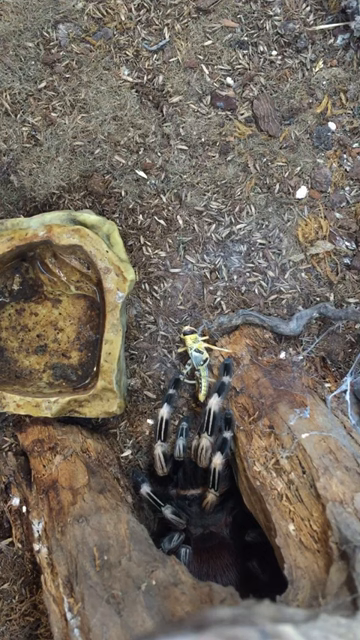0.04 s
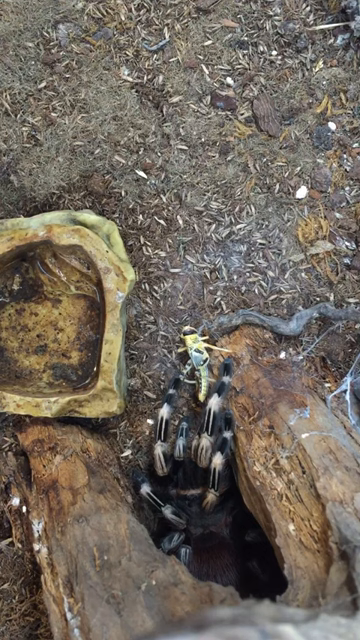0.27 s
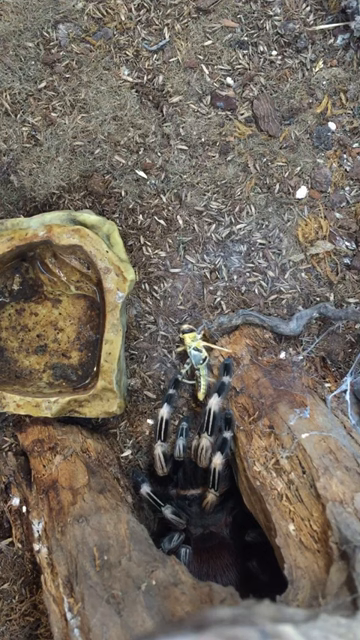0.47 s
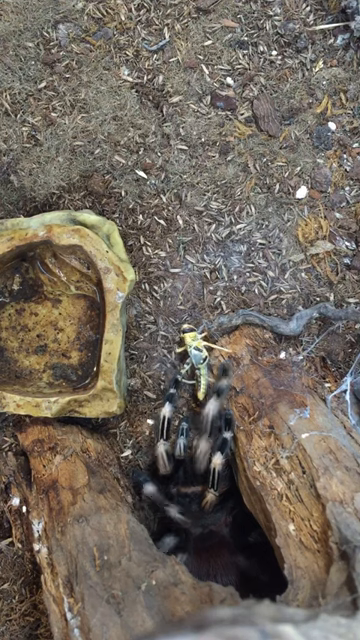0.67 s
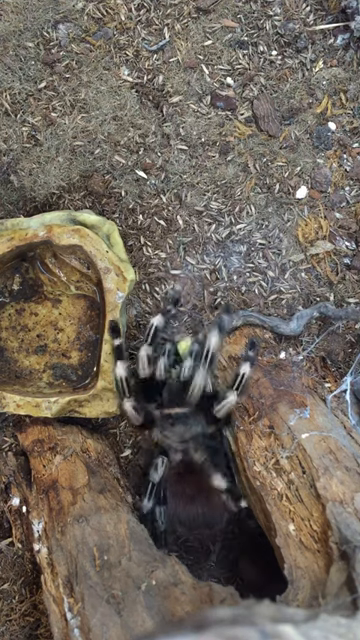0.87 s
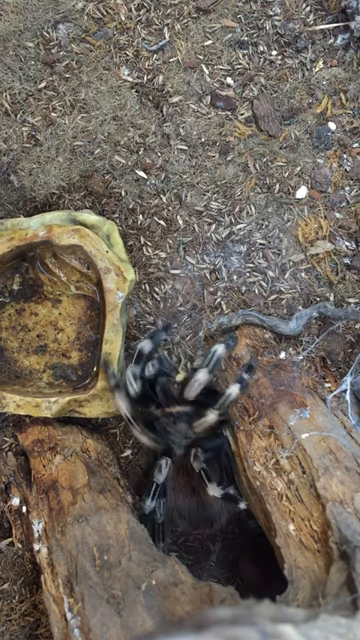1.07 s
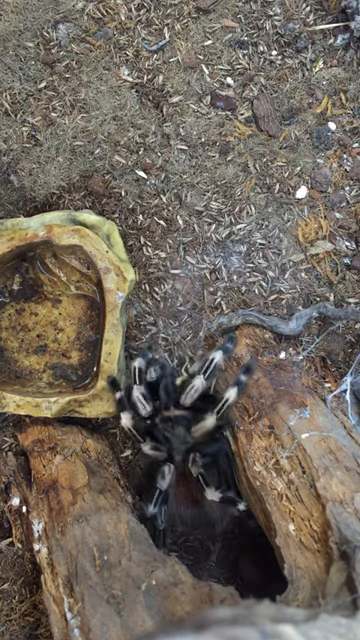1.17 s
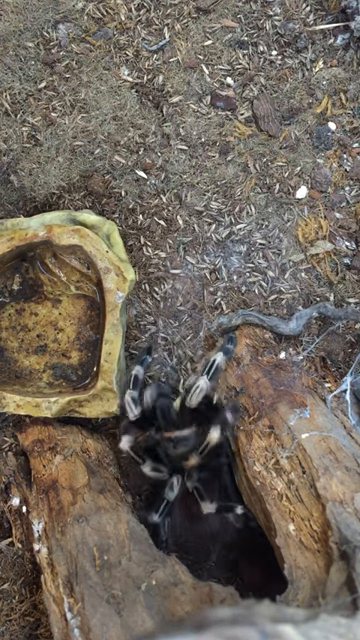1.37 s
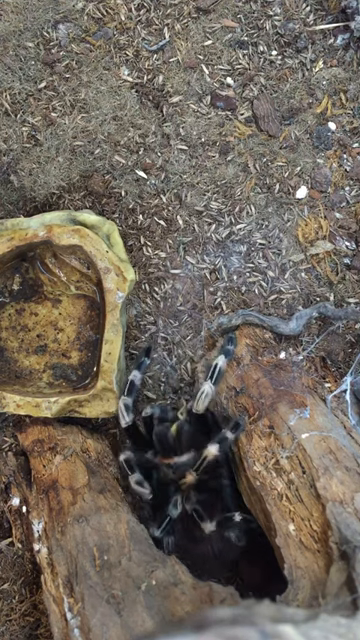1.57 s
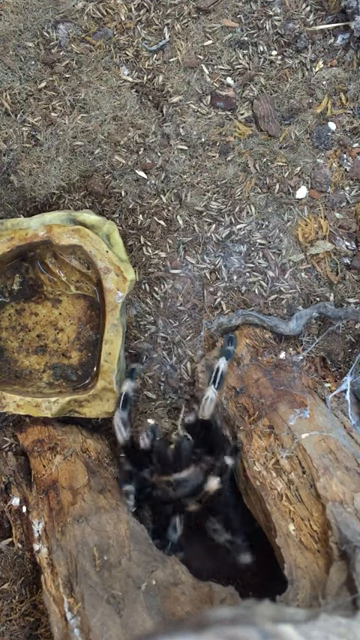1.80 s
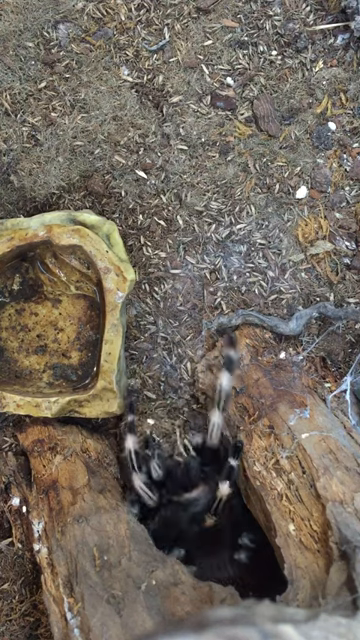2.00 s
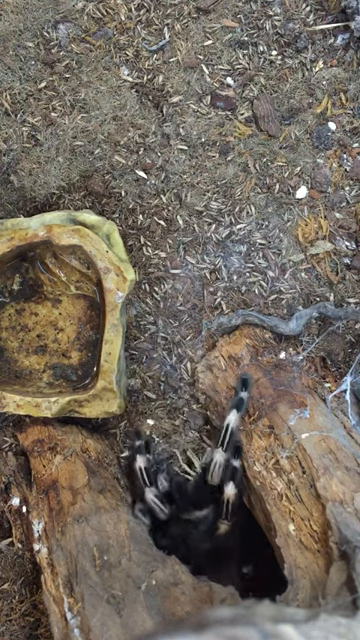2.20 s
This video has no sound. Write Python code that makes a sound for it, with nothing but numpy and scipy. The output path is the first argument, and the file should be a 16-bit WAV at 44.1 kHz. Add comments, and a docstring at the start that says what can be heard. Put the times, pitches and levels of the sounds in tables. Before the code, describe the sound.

A deep, dull thud sounds nearby and dies away in a room with faint electrical hum. Dry litter rustles softly as a spider pounces in a glass tank, and small, close cracks follow as it bites its prey.

```python
"""A quiet room with mains hum; a tarantula on dry litter in a glass tank.
A heavy, muffled thud, like a door shutting nearby, sets the room's low modes booming.
The spider lunges at an insect: litter snaps under its legs and it lands with soft knocks.
The prey's shell cracks in its fangs and rings briefly. Faint tones sound far off."""
import sys
import numpy as np
from scipy import signal
from scipy.fft import rfft, irfft
from scipy.io import wavfile

SR = 44100
rng = np.random.default_rng(int(sys.argv[2]) if len(sys.argv) > 2 else 0)


def unload_wav(signal):
    """Save mono or channel-first audio to the path in sys.argv[1] as 16-bit WAV at rate SR, clipped to [-1, 1]."""
    wavfile.write(
        sys.argv[1],
        SR,
        np.round(np.clip(np.atleast_2d(signal).T, -1, 1) * 32767).astype(np.int16),
    )


N = 99225
TIME_S = np.arange(N) / SR

# mains lines (frequency [Hz], level [dB])
HUM_LINES = [(49.5, -73.5), (100.2, -64), (150, -77.5), (200.3, -77), (301, -90.5)]
# room air and hiss (frequency [Hz], relative density [dB])
AIR_SPECTRUM = [(20, -120), (45, -82), (80, -87.5), (180, -92), (260, -102), (420, -110), (700, -111),
                (1400, -115), (2700, -117), (5000, -121), (9500, -123.5), (10600, -127), (14500, -126),
                (16000, -136)]
# blows of the thud (time [s], boom [dB], clatter [dB], rattle [dB])
THUD_BLOWS = [(0.039, -45.5, -79, -86), (.136, -18.5, -61.5, -70.5), (.246, -0.5, -51.5, -66),
              (0.317, -23.5, -70, -84)]
# beating room mode pairs (frequency [Hz], relative level [dB], t60 [s], split [Hz])
ROOM_MODE_PAIRS = [(46.5, -13, 0.72, 4.4), (64.3, -31.5, 0.52, 9), (81.25, -29.5, 0.83, 6.2),
                   (95.2, -44.5, 0.81, 11), (128.4, -48.5, .5, 3.7), (173.3, -24.5, 0.88, 2.4),
                   (191.1, -35.5, 1, 3.2)]
# low, mid and high noise of a blow (frequency [Hz], relative density [dB])
RUMBLE_SPECTRUM = [(25, -31.5), (40, 1.5), (75, 15.5), (120, 2.5), (200, -1.5), (260, -13), (350, -23.5),
                   (500, -69.5)]
CLATTER_SPECTRUM = [(250, 3.5), (450, -3), (570, 0), (675, 7), (850, -4), (980, -13), (1230, -9),
                    (1500, -25), (2200, -54)]
RATTLE_SPECTRUM = [(1400, -8), (2000, -6), (2850, 0), (3600, -6), (5000, -13), (6500, -15), (9000, -28.5),
                   (15000, -43)]
# knocks and ticks (time [s], frequency [Hz], width [Hz], level [dB], hold [s], t60 [s])
KNOCK_EVENTS = [(0.12, 742, 130, -69, 0.039, .1), (0.136, 2850, 180, -69.5, 0.022, 0.22),
                (0.131, 3280, 150, -72.5, 0.0065, .12), (0.209, 350, 38, -48, 0.035, 0.048),
                (0.213, 172, 30, -44, 0.024, .08), (0.236, 79.7, 20.2, -30, 0.034, 0.075),
                (0.549, 201.4, 6, -56, 0.044, 0.051), (.85, 4330, 420, -73, 0.017, 0.078),
                (0.888, 272, 70, -52, 0.0053, 0.074), (0.895, 458, 260, -61, 0.011, 0.092),
                (0.892, 734, 130, -73, .015, .15), (0.902, 194.4, 56, -61, 0.0273, 0.066),
                (.889, 1970, 296, -64.5, 0.0049, 0.053), (0.904, 84.8, 54, -53.5, 0.047, 0.32),
                (0.978, 1210, 44, -77, 0.0076, 0.066), (1.829, 167, 36, -59, 0.021, 0.08)]
# far tones (time [s], nominal length [s], level [dB], frequency [Hz])
TONE_EVENTS = [(0.757, 0.12, -69.5, 705), (1.112, 0.14, -81.5, 385), (1.272, 0.041, -69.5, 560),
               (1.337, 0.02, -64, 561), (1.349, 0.043, -81, 1290), (1.466, 0.073, -72, 705),
               (1.476, 0.061, -81, 546), (1.535, 0.21, -83, 759), (1.605, 0.062, -82.5, 1530),
               (1.896, 0.054, -78.5, 600)]
# leg pushes on the litter (time [s], level [dB], hold [s], t60 [s])
LEG_PUSHES = [(0.826, -77.5, 0.023, 0.11), (0.846, -70, 0.015, 0.21), (0.886, -72.5, 0.0069, 0.55),
              (0.961, -85, 0.065, 0.86), (1.177, -84, 0.13, 0.38)]
# litter snaps (frequency [Hz], relative density [dB])
LITTER_SPECTRUM = [(1000, -22), (2500, -1.5), (4300, -0.5), (7500, -4.5), (9400, 2.5), (10500, -4),
                   (12000, 2), (15500, -2)]
# cracks of shell and husks (time [s], body drive [dB], middle drive [dB], top drive [dB])
CRACK_EVENTS = [(0.8914, -57.5, -57, -72), (1.0851, -83, -69, -59), (1.8252, -50.5, -67, -67),
                (1.827, -54.5, -65, -61), (1.987, -40.5, -37, -30.5), (2.010, -58, -53, -57),
                (2.0156, -64, -52, -68), (2.0175, -66, -75, -55), (2.1125, -84, -71, -60),
                (2.119, -82, -67, -48.5), (2.1233, -84, -78, -56), (2.149, -80, -50, -36),
                (2.155, -84, -66, -63), (2.163, -87, -67, -48), (2.186, -82, -61, -55)]
# shell modes, four each for body, middle, top (frequency [Hz], relative level [dB], t60 [s])
CRACK_MODES = [(723, -9.5, 0.007), (990, -3.5, 0.0061), (2300, -4, 0.0044), (3020, -14.5, 0.004),
               (4570, -23, 0.0056), (5760, -6, 0.0026), (6530, -15, 0.0025), (7660, -9, .0035),
               (9260, -5, 0.0021), (11770, -10, 0.0035), (13400, -18, 0.0044), (15000, -22, .003)]
# high-pass corner of each mode group (body [Hz], middle [Hz], top [Hz])
GROUP_HIGHPASS_HZ = [563, 2570, 5960]


def from_db(db):
    """Decibels to gain."""
    return 10 ** (np.asarray(db) / 20)


def unit_rms(x):
    """Scale to unit power."""
    return x / np.sqrt(np.mean(x ** 2) + 1e-20)


def butter(x, order, corner_hz, kind):
    """Butterworth filter."""
    return signal.sosfilt(signal.butter(order, corner_hz, kind, fs=SR, output="sos"), x)


def colour(x, spectrum):
    """Shape a steady signal's spectrum; unit power."""
    hz, db = np.transpose(spectrum)
    grid_hz = np.maximum(np.arange(N // 2 + 1) * SR / N, 1)
    gain = from_db(np.interp(np.log(grid_hz), np.log(hz), db))
    return unit_rms(irfft(rfft(x) * gain, N))


def noise(spectrum):
    """Steady coloured noise; unit power."""
    return colour(rng.standard_normal(N), spectrum)


def narrow_noise(hz, width_hz):
    """Noise in one resonance; unit power."""
    grid_hz = np.arange(N // 2 + 1) * SR / N
    rolloff = 1 + (2 * (grid_hz - hz) / width_hz) ** 2
    return unit_rms(irfft(rfft(rng.standard_normal(N)) / rolloff, N))


def decay(age_s, t60_s):
    """Exponential fall, 60 dB per t60."""
    return np.exp(-np.log(1000) * age_s / t60_s)


def envelope(start_s, rise_s, hold_s, t60_s):
    """Rounded rise; exponential release from start + hold."""
    age_s = TIME_S - start_s
    attack = np.sin(np.pi / 2 * np.clip(age_s / rise_s, 0, 1)) ** 2
    return attack * decay(np.maximum(age_s - hold_s, 0), t60_s)


def ring(force, hz, t60_s):
    """One mode: a unit click starts a decaying unit cosine."""
    radius = decay(1 / SR, t60_s)
    pole_real = radius * np.cos(2 * np.pi * hz / SR)
    return signal.lfilter([1, -pole_real], [1, -2 * pole_real, radius ** 2], force + 1e-18)


def room_tone(air_db=-65.5):
    """Mains hum over low air noise and hiss."""
    hum = sum(from_db(db) * np.sqrt(2) * np.sin(2 * np.pi * (hz * TIME_S + rng.random()))
              for hz, db in HUM_LINES)
    return hum + from_db(air_db) * noise(AIR_SPECTRUM)


def thud(rumble_re_boom_db=-36, boom_lowpass_hz=420):
    """Each blow sets low mode pairs beating, with rumble, reverberant clatter and thin rattle."""
    low, high = np.zeros((2, N))
    rumble, clatter, rattle = noise(RUMBLE_SPECTRUM), noise(CLATTER_SPECTRUM), noise(RATTLE_SPECTRUM)
    for start_s, boom_db, clatter_db, rattle_db in THUD_BLOWS:
        age_s = np.maximum(TIME_S - start_s, 0)
        for hz, db, t60_s, split_hz in ROOM_MODE_PAIRS:
            pair = np.sin(np.pi * split_hz * age_s) * np.cos(2 * np.pi * hz * age_s)
            low += from_db(boom_db + db) * decay(age_s, t60_s) * pair
        rumble_db = boom_db + rumble_re_boom_db
        low += from_db(rumble_db) * rumble * envelope(start_s, rise_s=0.012, hold_s=0.081, t60_s=0.98)
        high += from_db(clatter_db) * clatter * envelope(start_s, rise_s=0.012, hold_s=0.081, t60_s=0.28)
        high += from_db(rattle_db) * rattle * envelope(start_s, rise_s=0.0095, hold_s=0.0095, t60_s=0.36)
    return butter(low, 4, boom_lowpass_hz, "low") + high


def knocks(rise_s=0.0042):
    """Hollow knocks around the thud and as the spider moves; one rough resonance each."""
    out = np.zeros(N)
    for start_s, hz, width_hz, db, hold_s, t60_s in KNOCK_EVENTS:
        phase = np.angle(signal.hilbert(narrow_noise(hz, width_hz)))
        tone = np.sqrt(2) * np.cos(phase)  # rough pitch, even strength
        knock = from_db(db) * tone * envelope(start_s, rise_s, hold_s, t60_s)
        out += butter(knock, 2, [hz / np.sqrt(2), hz * np.sqrt(2)], "band")
    return out


def far_tones(waver_rms_hz=20):
    """Soft, wavering distant tones, fading in the room."""
    out = np.zeros(N)
    for start_s, length_s, db, hz in TONE_EVENTS:
        pitch_hz = hz + waver_rms_hz * narrow_noise(0, width_hz=100)
        tone = np.sqrt(2) * np.sin(2 * np.pi * np.cumsum(pitch_hz) / SR)
        out += from_db(db) * tone * envelope(start_s, rise_s=0.023, hold_s=0.61 * length_s, t60_s=0.11)
    return out


def litter_rustle(snaps_per_s=2200, spread_db=1.5, rise_s=0.0041):
    """Dense tiny snaps of dry litter under each leg push."""
    sizes = from_db(spread_db * np.minimum(rng.exponential(1, N), 4))
    signs = rng.choice([-1, 1], N)
    snaps = sizes * signs * (rng.random(N) < snaps_per_s / SR)
    pushes = sum(from_db(db) * envelope(start_s, rise_s, hold_s, t60_s)
                 for start_s, db, hold_s, t60_s in LEG_PUSHES)
    return colour(snaps, LITTER_SPECTRUM) * pushes


def shell_cracks(splinter_db=-5.5, reflection_db=-12):
    """A sharp break, micro-fractures and reflections off the glass drive the shell's modes."""
    forces = np.zeros((3, N + SR))
    burst_samples = SR // 16
    age_s = np.arange(burst_samples) / SR
    splinters = from_db(splinter_db) * decay(age_s, t60_s=0.0029)
    reflections = from_db(reflection_db) * decay(age_s, t60_s=0.036)
    tails = np.array([reflections, reflections + splinters, reflections + splinters])  # body, middle, top
    for start_s, *drive_db in CRACK_EVENTS:
        burst = tails * (rng.random(burst_samples) - 0.5)
        burst[:, 0] = 1  # the break
        start = int(start_s * SR)
        forces[:, start:start + burst_samples] += from_db(drive_db)[:, None] * burst
    out = np.zeros(N)
    groups = np.split(np.array(CRACK_MODES), 3)
    for force, modes, highpass_hz in zip(forces, groups, GROUP_HIGHPASS_HZ):
        shell = sum(from_db(db) * ring(force[:N], hz, t60_s) for hz, db, t60_s in modes)
        out += butter(shell, 2, highpass_hz, "high")
    return out


def scene():
    """All sources, mono."""
    return (room_tone() + thud() + knocks() + far_tones() + litter_rustle() + shell_cracks())[None]


def record(dry):
    """Cut the deepest bass and the top."""
    highpass_hz, lowpass_hz = 27, 16100
    lowpass = signal.ellip(10, 0.2, 70, lowpass_hz, fs=SR, output="sos")
    return signal.sosfilt(lowpass, butter(dry, 4, highpass_hz, "high"))


dry = scene()
out = record(dry)
unload_wav(out)
```